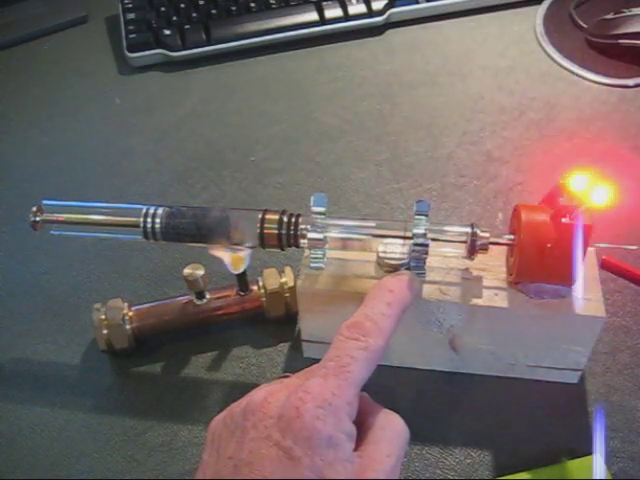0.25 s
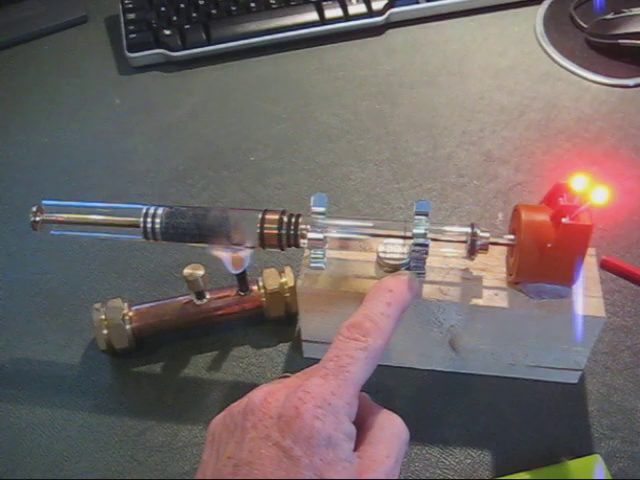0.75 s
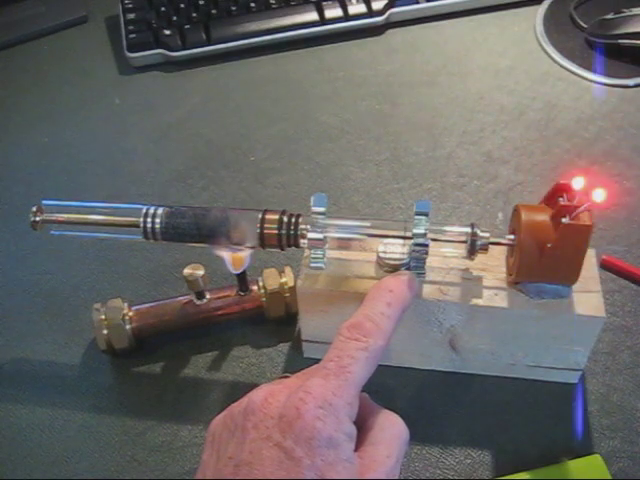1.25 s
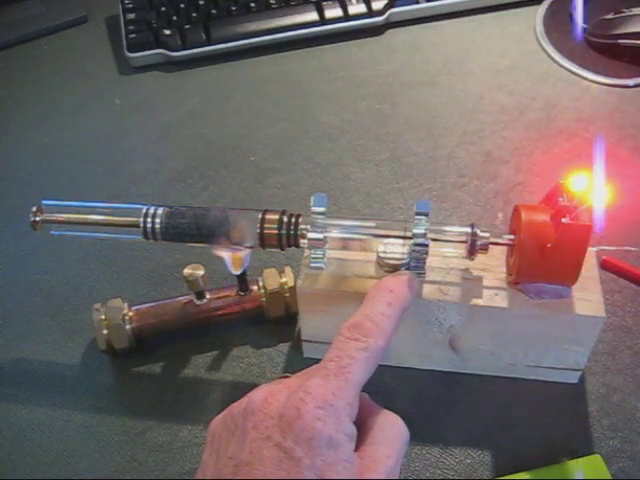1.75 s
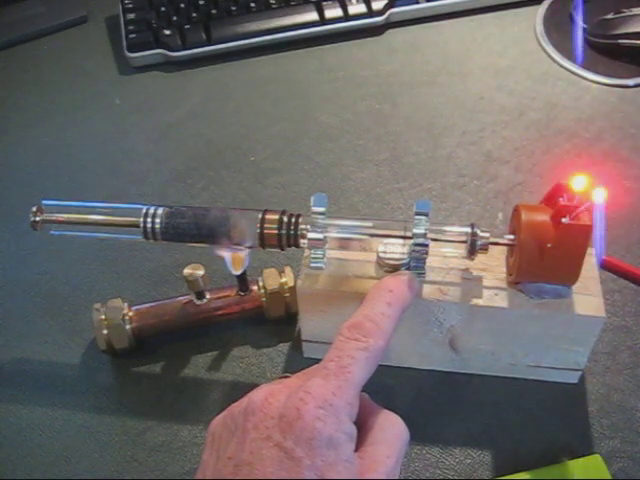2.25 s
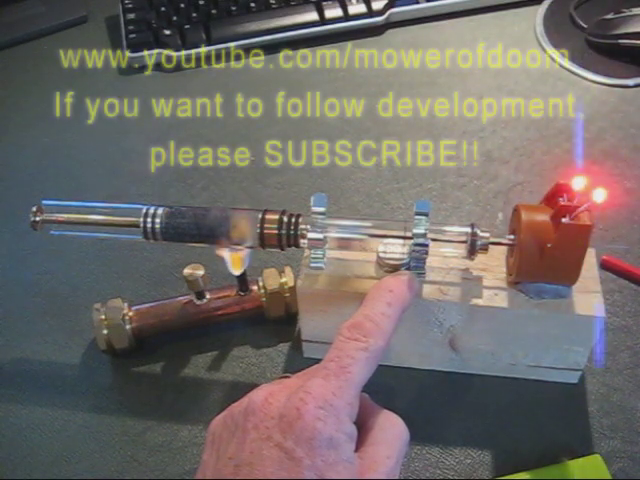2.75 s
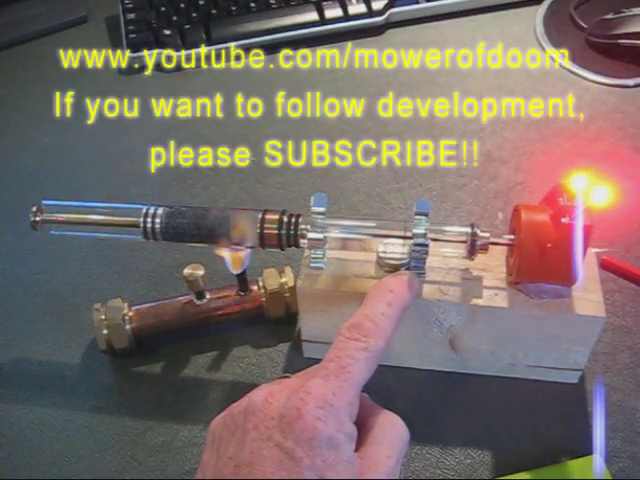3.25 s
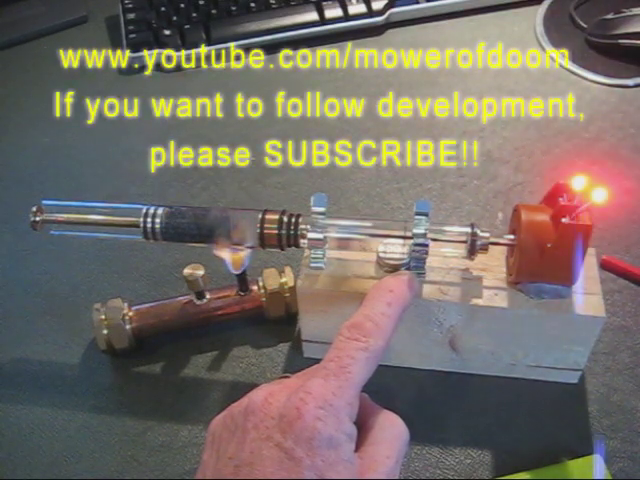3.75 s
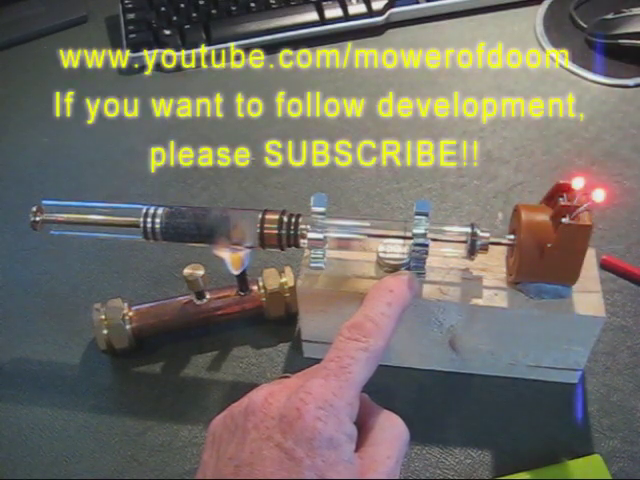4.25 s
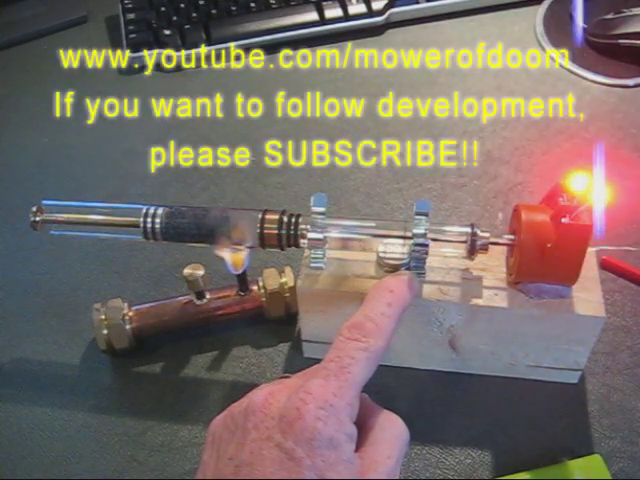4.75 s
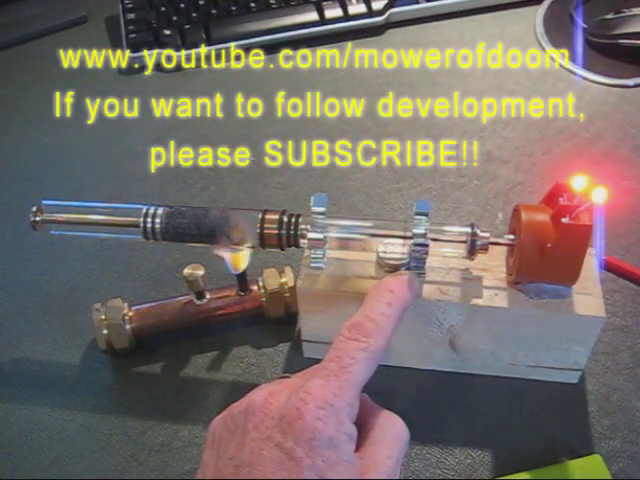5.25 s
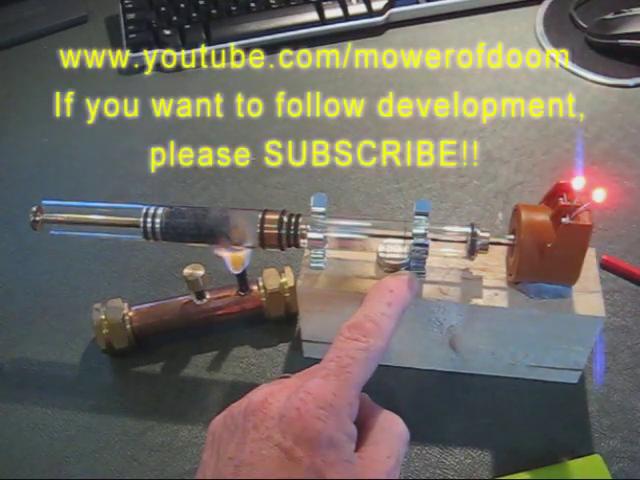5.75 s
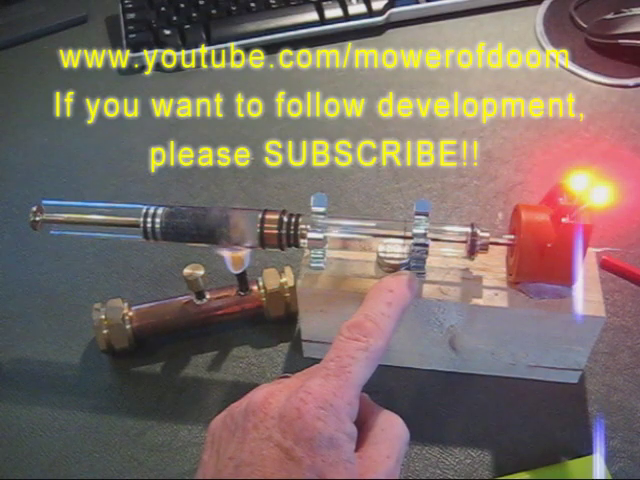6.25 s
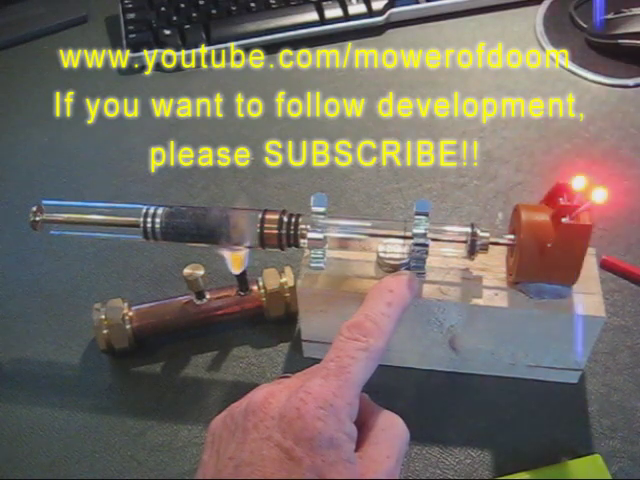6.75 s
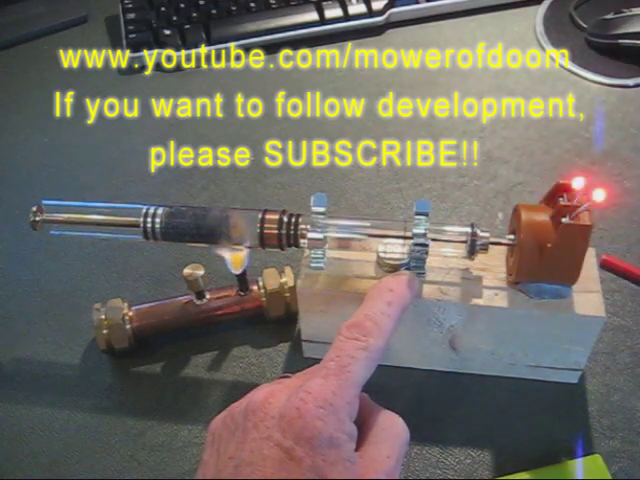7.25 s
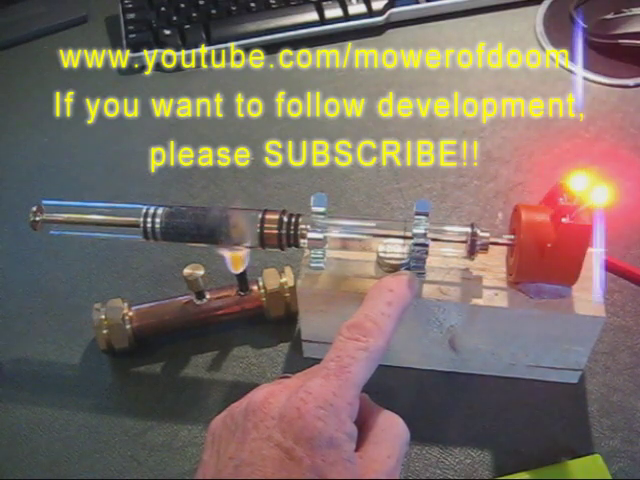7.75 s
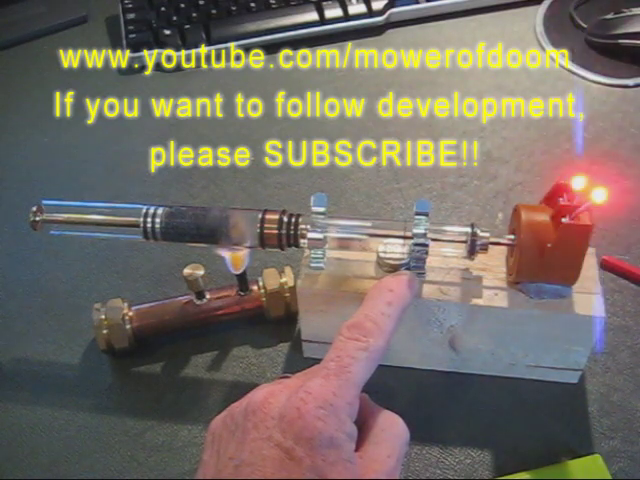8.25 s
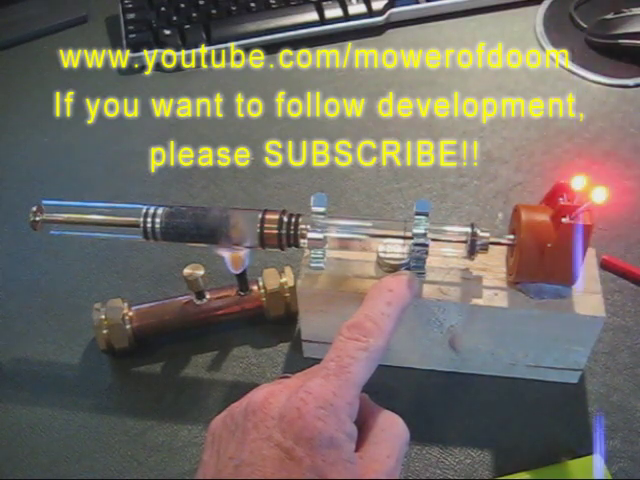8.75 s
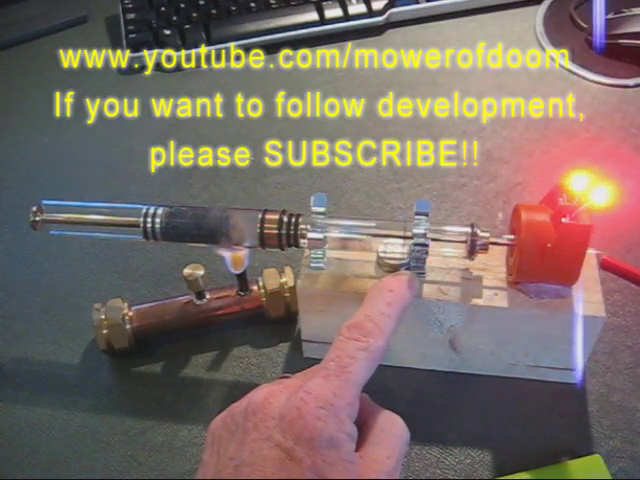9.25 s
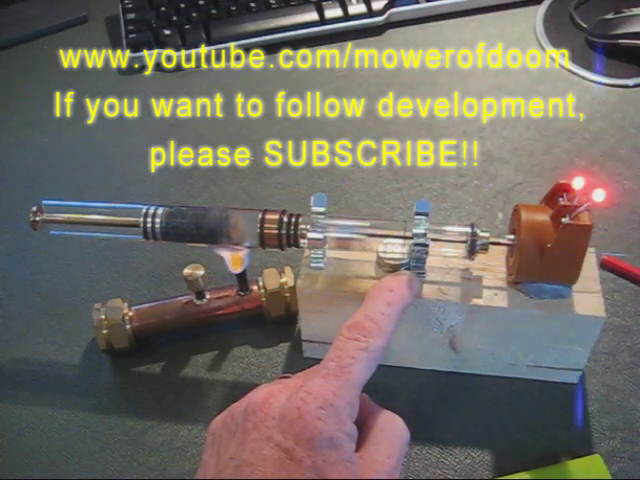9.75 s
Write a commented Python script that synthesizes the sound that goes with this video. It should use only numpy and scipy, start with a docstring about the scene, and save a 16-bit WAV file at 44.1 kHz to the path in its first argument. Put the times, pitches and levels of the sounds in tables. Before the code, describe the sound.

A small hot-air engine with a loose piston buzzes and rattles rapidly on a desk, its metallic chatter swelling and easing every second and a half.

```python
"""A small free-piston hot-air engine runs on a desk, close by, at about 30 strokes a second.
On every stroke the loose piston taps, knocks and chatters against its guide: short pulses ring the frame's
resonances, and bursts of filtered noise make the metal rattle. Its swing surges about every second and a half.
The knocks get harder at each crest, while sine tones (thud, squeal, chirp) follow the swing up and back down.
Sines at multiples of the stroke rate make the base hum, a small room answers, and soft noise lies behind it all."""
import sys
import numpy as np
from scipy import signal
from scipy.fft import rfft, irfft
from scipy.io import wavfile
from scipy.ndimage import uniform_filter1d, map_coordinates

SR = 44100
rng = np.random.default_rng(int(sys.argv[2]) if len(sys.argv) > 2 else 0)


def store_wav(level_fs):
    """Save 16-bit WAV to argv[1]."""
    pcm = np.round(np.clip(np.atleast_2d(level_fs), -1, 1) * 32767)
    wavfile.write(sys.argv[1], SR, pcm.T.astype(np.int16))


N = 440559
TIME = np.arange(N) / SR  # [s]
FREQ = np.arange(N + 1) * SR / (2 * N)  # [Hz]
TOP_HZ = 14900
LATE_S = .00232  # how much later the piston reaches its guide at full swing
START_TURN = .297  # where in its cycle the piston starts [turns]

# Lulls and crests in turn: (time [s], swing [0-1], stroke rate [Hz])
SURGE_POINTS = [(-0.423, 0.082, 29.392), (0.422, 0.87, 29.841), (1.166, 0.02, 29.497),
                (1.885, 0.892, 29.854), (2.583, 0.055, 29.522), (3.331, 0.889, 29.859),
                (4.125, 0.0, 29.456), (4.91, 0.878, 29.794), (5.628, 0.0, 29.475), (6.319, 0.863, 29.817),
                (7.087, 0.0, 29.426), (7.873, 0.893, 29.753), (8.486, 0.021, 29.476),
                (9.261, 0.943, 29.843), (9.832, 0.0, 29.432)]
# The swings that the rows of STROKE_CONTACT stand for: swing [0-1]
CONTACT_SWINGS = [0, .25, .5, .75, 1]
# How the piston meets its guide, from small swing to full: (first gap between bounces [ms],
# centre of the loudness hump over the bounces [ms], half-length of that hump [ms],
# chatter level [dB], tap level [dB], scrape level of the knock [dB])
STROKE_CONTACT = [(1.243, 6.1, 1.1, 27.5, 7.5, -32.5), (1.257, 6.84, 2.03, 20, 10.5, -28),
                  (1.147, 5.97, 1.45, 16.5, 12.5, -26), (1.125, 5.33, 0.67, 22.5, 15, -24.5),
                  (1.13, 5.7, 0.94, 23.5, 13, -18)]
# Resonances of the frame and base: (pitch at half swing [Hz], width [Hz], level under the bounces [dB],
# level under the tap [dB], pitch rise from no swing to full [share])
FRAME_MODES = [(639.3, 49.2, -1.5, 6, 0.051), (751, 121, -7, -13, 0.19), (964, 190, -15.5, -6.5, 0.089),
               (1254, 23, -30, 2, 0.0086), (1322, 28, -13, 0, 0.081), (1690, 260, -9.5, -14.5, 0.0046),
               (1759, 137, -7.5, -12, -0.086), (2407, 40, -22, -17, -0.012), (2784, 53, -2, -1.5, -0.014),
               (3130, 158, -15.5, -4.5, 0.11), (3230, 62, -16.5, -16, 0.0085), (4480, 52, -14, -14, -0.084),
               (5050, 52, -13, -7, -0.016)]
# Low body of the knock: (swing [0-1], pitch [Hz], level [dB], loudest moment in the stroke [ms], half-length [ms])
THUD_BY_SWING = [(0, 670, -24.5, 8.7, 3.6), (.25, 722, -25, 8.8, 2.76), (.5, 770, -19, 7.6, 2.3),
                 (.7, 775, -24.5, 6.36, 2.25), (.9, 832, -13, 5.66, 1.45)]
# Squeal of the sliding piston: (swing [0-1], pitch [Hz], level [dB], loudest moment in the stroke [ms],
# half-length [ms])
SQUEAL_BY_SWING = [(0, 1579, -30, 10.2, 5.2), (.2, 1591, -26, 7.5, 4.3), (.37, 1611, -18, 9.7, 4.16),
                   (.52, 1668, -23, 6.1, 7.2), (.68, 1734, -26.5, 4.5, 5.1), (.9, 1795, -29.5, 5.7, 5.8)]
# Partials of the squeal: (multiple of its pitch, added level at no swing [dB],
# added level at full swing [dB], lag [ms])
SQUEAL_OVERTONES = [(0.999, -0.5, -2.5, 0), (1.999, -8.5, -18, 1.2), (2.882, -7.5, -25, 0.87)]
# Thin chirp: (swing [0-1], pitch [Hz], level [dB], loudest moment in the stroke [ms], half-length [ms])
CHIRP_BY_SWING = [(0, 3110, -39, 1.8, 1.6), (.35, 2750, -34.5, 3, 2.8), (.5, 2808, -25.5, 9.2, 2.3),
                  (.65, 2870, -25.5, 9.7, 3.3), (.76, 2791, -20, 12, 3), (.9, 2770, -27, 9.9, 1.7)]
# Resonances of rod, tube and fittings: (pitch [Hz], width [Hz], relative level when knocked [dB],
# relative level when tapped [dB])
METAL_MODES = [(948, 290, -1.5, -40), (1652, 273, 3, -23), (2240, 1060, -4.5, -28), (2600, 245, -2, 3.5),
               (3220, 220, -3, 9.5), (3874, 445, -3.5, 7), (4480, 250, -0.5, 9.5), (5260, 240, -6, 1),
               (5666, 246, -1.5, 2.5), (6540, 430, -4.5, 1), (7070, 240, -2.5, -29),
               (7650, 730, -10.5, -5.5), (9194, 280, -8.5, -21), (10900, 480, -14.5, -23),
               (11830, 380, -18, -25), (13160, 490, -18, -23)]
# Shaking of the base: (multiple of the stroke rate, relative level [dB])
SHAKE_LINES = [(1, -34), (2, -7), (3, -11), (4, -8.5), (5, -36), (6, -7.5), (7, -2), (8, -1), (9, 3),
               (11, 5), (12, -0.5), (14, 0.5), (15, -2)]
# Colour of the background noise: (frequency [Hz], relative level [dB])
AIR_COLOUR = [(20, 0), (60, 4), (130, 4.5), (250, 6.5), (500, 4), (1500, 10.5), (5000, -45), (14000, -47)]


def undb(db):
    """Turn decibels into a gain."""
    return 10 ** (np.asarray(db) / 20)


def unit(x):
    """Scale to an average strength (rms) of 1."""
    return x / np.sqrt(np.mean(np.abs(x) ** 2))


def filtered(x, response):
    """Shape a sound with a frequency response given on FREQ."""
    return irfft(rfft(x, 2 * N) * response)[:N]


def resonance(hz, centre_hz, width_hz):
    """One part that rings at its own pitch; a wider resonance dies away sooner."""
    return 1j * hz * width_hz / (centre_hz ** 2 - hz ** 2 + 1j * hz * width_hz)


def weak_bass(hz, cut_hz):
    """Small parts move little air at low pitch, so the sound thins out below cut_hz."""
    s = 1j * hz / cut_hz
    return s ** 2 / (s ** 2 + s + 1)


def surges():
    """The swing and stroke rate ease smoothly between lulls and crests."""
    when, swing, rate = np.transpose(SURGE_POINTS)
    row = np.arange(len(when))
    place = np.interp(TIME, when, row)
    eased = np.floor(place) + np.sin(np.pi / 2 * (place % 1)) ** 2
    return np.interp(eased, row, swing), np.interp(eased, row, rate)


def clock(taps):
    """Tell for every sample which stroke is under way and how many ms ago it began."""
    stroke = np.maximum(np.searchsorted(taps, TIME) - 1, 0)
    ms = 1000 * np.maximum(TIME - taps[stroke], 0)
    return stroke, ms


def contact(swing):
    """Read how the piston meets its guide at the given swings."""
    return [np.interp(swing, CONTACT_SWINGS, column) for column in np.transpose(STROKE_CONTACT)]


def touch(hz, ms):
    """The spectrum of a single sharp pulse that comes ms into the stroke."""
    return np.exp(-2j * np.pi * hz * ms / 1000)


def piston_blows(hz, taps, swing, chance, knock_ms=4.63, slowing=0.031, uneven_ms=0.027,
                 lead_db=-6, lead_ms=1.308, back_ms=21.5, back_db=-0.5,
                 soft_hz=1150, firm_swing=0.25, early_ms=0.702, gathering_db=-0.09):
    """The piston grazes its guide, knocks and bounces in a dying train, with a soft nudge on the way back."""
    gap_ms, centre_ms, length_ms, chatter_db, tap_db, _ = (column[:, None] for column in contact(swing))
    blows = 0
    for k in range(8):
        # each gap is a little longer than the one before
        ms = knock_ms + gap_ms * (k + slowing * k * (k - 1) / 2) + uneven_ms * chance[:, k, None]
        strength = undb(chatter_db) * np.exp(-((ms - centre_ms) / length_ms) ** 2)
        blows = blows + strength * touch(hz, ms)
    # three light grazing touches lead up to the knock
    grazes = sum(touch(hz, knock_ms - k * lead_ms) for k in range(1, 4))
    blows = blows + undb(tap_db + lead_db) * grazes
    # a soft nudge at the other end of the travel, duller above 1200 Hz
    blows = blows + undb(back_db) * touch(hz, back_ms) / (1 + 1j * hz / 1200)
    # at small swings the touches are soft and lose their treble
    softness = np.clip(1 - swing[:, None] / firm_swing, 0, 1)
    blows = blows / (1 + softness * (hz / soft_hz) ** 2)
    # a wide swing brings all these blows sooner
    blows = blows * touch(hz, -early_ms * swing[:, None])
    # blows are slightly lighter while the swing grows than while it shrinks
    growth = uniform_filter1d(np.gradient(swing, taps), size=5)  # [swing per second]
    return blows * undb(gathering_db * growth[:, None])


def chatter(taps, swing, scatter_db=.5, tap_ms=0.32, cut_hz=640, size=4096):
    """The tap and the bouncing blows ring the frame, whose pitches glide with the swing."""
    hz = np.arange(size // 2 + 1) * SR / size
    chance = rng.standard_normal((len(taps), 9))
    blows = piston_blows(hz, taps, swing, chance)
    tap_db = contact(swing)[4][:, None]
    tap = undb(tap_db) * touch(hz, tap_ms)
    ring = 0
    # the piston's pressure changes how stiff the frame is, so each mode shifts with the swing
    for k, (mode_hz, width_hz, blow_db, tapped_db, rise) in enumerate(FRAME_MODES):
        centre_hz = mode_hz * (1 + rise * (swing[:, None] - .5))
        push = undb(blow_db) * blows + undb(tapped_db) * tap
        ring = ring + (-1) ** k * resonance(hz, centre_hz, width_hz) * push
    ring = ring * weak_bass(hz, cut_hz) * undb(scatter_db * chance[:, -1:])
    # add every stroke's ringing at its own place in time
    at = np.round(taps * SR).astype(int)[:, None] + np.arange(size)
    sound = irfft(ring, axis=1)
    return np.bincount(at[at >= 0], sound[at >= 0], N)[:N]


def tone(taps, swing, table, partials=((1, 0, 0, 0),), scatter_db=1.0, waver=0.0024):
    """A short sine tone in every stroke; the swing sets its pitch, level, moment and length."""
    stroke, ms = clock(taps)
    steps, *columns = np.transpose(table)
    hz, db, centre_ms, length_ms = (np.interp(swing, steps, column)[stroke] for column in columns)
    out = 0
    for multiple, gentle_db, hard_db, lag_ms in partials:
        chance = rng.standard_normal((len(taps), 2))[stroke]
        cycles = multiple * hz * (1 + waver * chance[:, 0]) * ms / 1000
        partial_db = gentle_db + (hard_db - gentle_db) * swing[stroke]
        gain = undb(db + partial_db + scatter_db * chance[:, 1])
        swell = np.exp(-((ms - centre_ms - lag_ms) / length_ms) ** 2)
        out = out + gain * swell * np.sin(2 * np.pi * cycles)
    return out


def thud(taps, swing):
    """The body of the knock: a long low groan at small swings, a short higher thud at wide ones."""
    return tone(taps, swing, THUD_BY_SWING, scatter_db=1.2)


def squeal(taps, swing, fade_db_per_s=-0.2):
    """The piston squeals along its guide, higher at wider swings, and weakens slowly as the engine runs."""
    fade = undb(fade_db_per_s * (TIME - TIME.mean()))
    return tone(taps, swing, SQUEAL_BY_SWING, SQUEAL_OVERTONES, scatter_db=0.3) * fade


def chirp(taps, swing):
    """A thin tone that is strongest as the swing nears its crest."""
    return tone(taps, swing, CHIRP_BY_SWING, scatter_db=1.6, waver=0.0072)


def burst(ms, start_ms, rise_ms, hold_ms, decay_ms):
    """The loudness of one contact: a quick rise, a hold while surfaces slide, then a smooth fall."""
    rise = np.clip((ms - start_ms) / rise_ms, 0, 1)
    fall = np.exp(-np.maximum(ms - start_ms - rise_ms - hold_ms, 0) / decay_ms)
    return rise * fall


def metal_response(level_column, cut_hz=570):
    """The metal parts ring together, in shares that depend on where they are struck."""
    total = 0
    for k, mode in enumerate(METAL_MODES):
        hz, width_hz = mode[:2]
        total = total + (-1) ** k * undb(mode[level_column]) * resonance(FREQ, hz, width_hz)
    return unit(total * weak_bass(FREQ, cut_hz))


def rattle(taps, swing, alike=0.57, scatter_db=1.8, tap_db=-2.5, return_db=-16, rub_db=-44,
           speed_up=.2, head_start_ms=0.713):
    """Rough metal on metal: a bright tap, the knock some 4 ms later, a faint brush back and a steady rub."""
    stroke, ms = clock(taps)
    chance = rng.standard_normal((len(taps), 3))
    scrape_db = contact(swing)[-1]
    knock_gain = undb(scrape_db + scatter_db * chance[:, 0])[stroke]
    tap_gain = undb(scrape_db + tap_db + scatter_db * chance[:, 1])[stroke]
    # the same surfaces meet each time; a wider swing runs over them faster, so their grain rises in pitch
    place_ms = ms + swing[stroke] * (head_start_ms + speed_up * ms)
    surface = map_coordinates(rng.standard_normal(N), [place_ms * SR / 1000], mode="mirror")
    grain = np.sqrt(alike) * surface + np.sqrt(1 - alike) * rng.standard_normal(N)
    # a knock at wide swing is over sooner
    decay_ms = np.interp(swing, [0, 1], [5.5, 2.3])[stroke]
    knock_clock_ms = ms + 0.041 * chance[stroke, 2]
    knock = burst(knock_clock_ms, start_ms=3.73, rise_ms=0.32, hold_ms=1.09, decay_ms=decay_ms)
    brush = undb(return_db) * burst(ms, start_ms=15.3, rise_ms=.7, hold_ms=1.4, decay_ms=1.75)
    tap = burst(ms, start_ms=0.3, rise_ms=0.56, hold_ms=0.87, decay_ms=1.7)
    # the tap lands on another spot than the knock, so it rings the parts differently
    knocking = filtered(grain * (knock_gain * (knock + brush) + undb(rub_db)), metal_response(2))
    tapping = filtered(grain * tap_gain * tap, metal_response(3))
    return knocking + tapping


def hum(turns, swing, hum_db=-55.0, swing_db=9):
    """The moving mass shakes the base at multiples of the stroke rate, more at full swing."""
    lines = sum(undb(db) * np.sin(2 * np.pi * (multiple * turns + rng.random()))
                for multiple, db in SHAKE_LINES)
    return unit(lines) * undb(hum_db + swing_db * swing)


def room(x, echo_ms=5.6, echo_db=-17, tail_db=-10.5, t60=0.16, dull_hz=2400):
    """One close reflection and a short blurred tail (60 dB down in t60 seconds), duller than the direct sound."""
    tail = rng.standard_normal(N) * undb(-60 * TIME / t60) * (TIME > .008)
    tail = rfft(tail / np.linalg.norm(tail), 2 * N)
    answer = undb(echo_db) * touch(FREQ, echo_ms) + undb(tail_db) * tail
    return filtered(x, 1 + answer / np.hypot(1, FREQ / dull_hz))


def air(air_db=-46.5):
    """Soft steady background noise, with almost no treble."""
    hz, db = np.transpose(AIR_COLOUR)
    colour = undb(np.interp(np.log(FREQ + 1), np.log(hz), db))
    return undb(air_db) * unit(filtered(rng.standard_normal(N), colour))


def scene(jitter_s=.00002, swing_scatter=0.012):
    """Each turn of the cycle starts one stroke; the swing sets the character of that stroke."""
    travel, rate = surges()
    turns = START_TURN + np.cumsum(rate) / SR
    taps = np.interp(np.arange(1, int(turns[-1]) + 1), turns, TIME)  # stroke starts [s]
    # the engine is already running: one stroke is under way at the start
    taps = np.append(2 * taps[0] - taps[1], taps)
    chance = rng.standard_normal((len(taps), 2))
    taps = taps + LATE_S * np.interp(taps, TIME, travel) + jitter_s * chance[:, 0]
    swing = np.interp(taps, TIME, travel) + swing_scatter * chance[:, 1]
    sliding = thud(taps, swing) + squeal(taps, swing) + chirp(taps, swing)
    engine = chatter(taps, swing) + sliding + rattle(taps, swing)
    mono = room(engine) + hum(turns, travel) + air()
    return np.array([mono, mono])


def record(dry):
    """A steep low-pass filter removes the treble above TOP_HZ."""
    low_pass = signal.ellip(8, .2, 70, TOP_HZ, fs=SR, output="sos")
    return signal.sosfilt(low_pass, dry)


dry = scene()
out = record(dry)
store_wav(out)
```